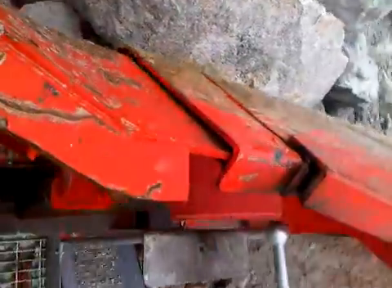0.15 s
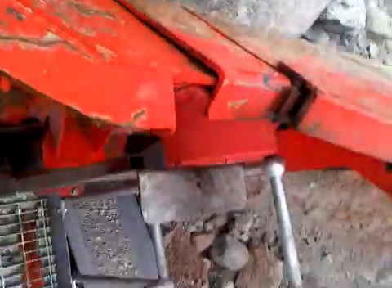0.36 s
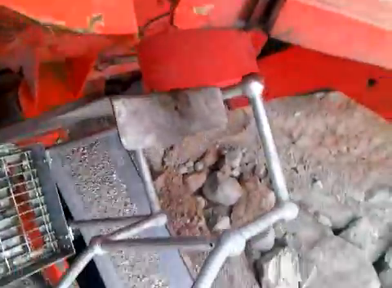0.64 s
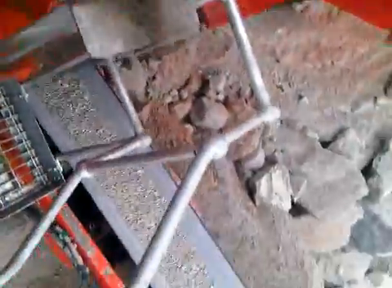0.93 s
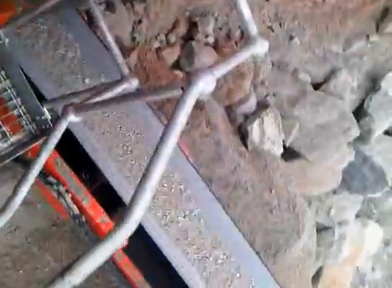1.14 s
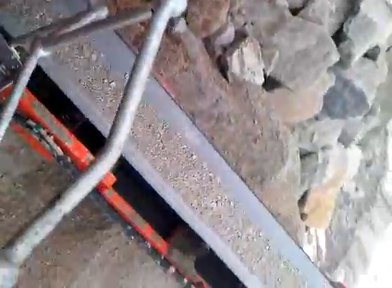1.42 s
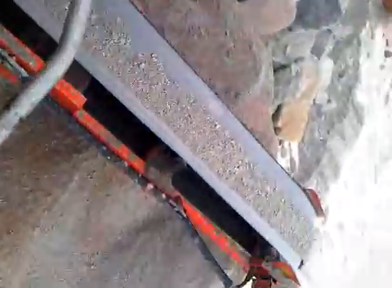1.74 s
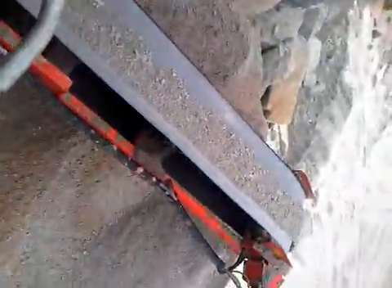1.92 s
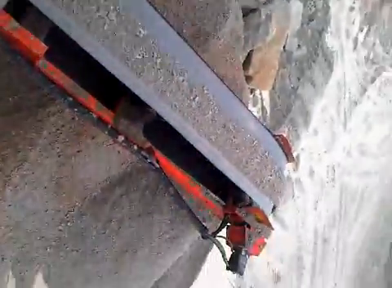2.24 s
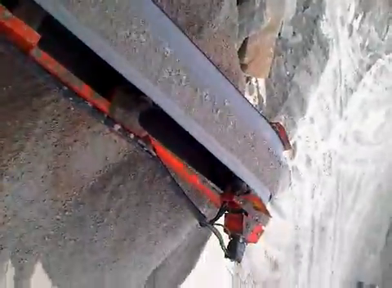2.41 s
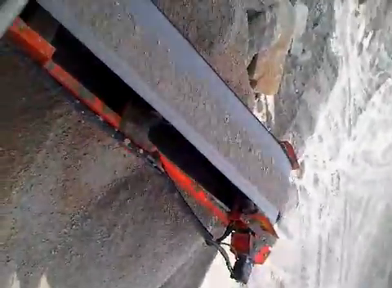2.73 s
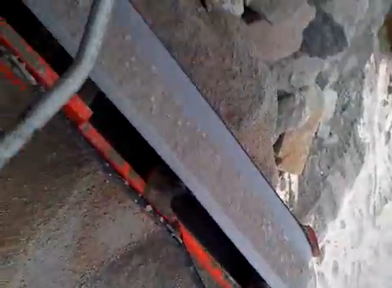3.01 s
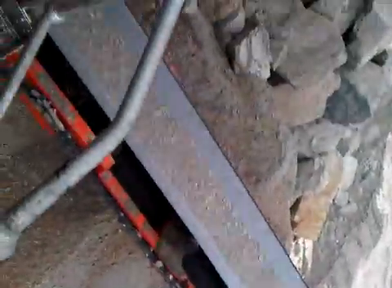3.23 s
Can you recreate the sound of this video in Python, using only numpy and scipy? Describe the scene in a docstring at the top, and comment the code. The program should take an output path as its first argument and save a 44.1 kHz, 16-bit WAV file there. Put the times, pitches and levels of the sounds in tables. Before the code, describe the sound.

From the machine's platform, heavy crunching blows ring a steel chamber in quick rhythm, with stone knocks, a brief clank near 0.85 seconds and constant engine drone; gravel rattle softens as the listener turns away.

```python
"""Jaw crusher in a quarry

Heard from the platform. The jaw bites about 4.6 times a second: random fractures ring the steel chamber.
Big rocks break with a blow and boom, and a low sine pulse is the thump of the overloaded microphone.
Damped modes make stones clack, chips ping and rocks knock. Filtered noise rattles as gravel on the
conveyor; a diesel's harmonics and a shaking frame drone below. Gravel and pebbles weaken as the
listener turns from the jaw.
"""
import sys
import numpy as np
from scipy import signal
from scipy.fft import rfft, irfft, next_fast_len
from scipy.io import wavfile
from scipy.ndimage import uniform_filter1d, map_coordinates

SR = 44100
rng = np.random.default_rng(int(sys.argv[2]) if len(sys.argv) > 2 else 0)


def generate_wav(sig):
    """Save sig (samples, or channels by samples) to the path in sys.argv[1] as 16-bit PCM at SR."""
    pcm = np.round(np.clip(np.atleast_2d(sig).T, -1, 1) * 32767).astype(np.int16)
    wavfile.write(sys.argv[1], SR, pcm)


N = 148617
T = np.arange(N) / SR

# Bites of the jaw. Each row: peak in seconds, rumble in dB, crunch in dB.
BITES = [(0.053, -16, -25), (0.281, -19, -17.5), (.505, -24, -17.5), (0.718, -19.5, -23), (0.938, -16, -22),
         (1.176, -15.5, -24), (1.377, -12.5, -16.5), (1.6, -17.5, -24), (1.816, -15.5, -23),
         (2.044, -14, -20), (2.243, -20.5, -25.5), (2.469, -15.5, -27), (2.691, -39, -29),
         (2.905, -23, -32), (3.128, -18.5, -18.5), (3.339, -16.5, -33)]
BITE_RISE_S, BITE_FALL_S = 0.04, 0.043
# Steel jaw housing. Each row: resonance in Hz, width in Hz, level in dB.
CHAMBER_MODES = [(160, 78, 3.5), (263, 111, 0.5), (371, 74.6, 3), (510, 65.7, 3.5), (752, 89, -5),
                 (1100, 450, -19.5)]
# Spectrum of crumbling stone. Each row: frequency in Hz, level in dB.
CRUNCH_SPECTRUM = [(150, -16.5), (500, 17.5), (900, 4), (1400, 5.5), (1950, -1.5), (2500, -12), (3700, -12),
                   (5000, -23), (6600, -21.5), (8500, -39)]

# Big rocks breaking. Each row: start in seconds, blow in dB, low thump of the overloaded microphone in dB,
# boom of the housing in dB.
BREAKS = [(0.055, -3, -19, -15.5), (.276, 0.5, -25, -20), (.3, -3.5, -21, -31.5), (0.929, -14, -55, -14.5),
          (1.371, 0, -18, -13.5), (1.573, 1, -25, -15), (1.821, -9.5, -51, -24), (2.048, -4, -24, -16),
          (3.127, -15, -54, -9.5)]
SHATTER_DB, SHATTER_T60_S = -11.5, 0.095  # dB relative to the blow
OVERLOAD_THUMP_HZ, OVERLOAD_THUMP_SIGMA_S = 37.7, 0.01
BOOM_HZ, BOOM_WANDER_HZ, BOOM_T60_S = 518.5, 17.8, 0.34

# Rocks lurching against the chamber walls. Each row: start in seconds, level in dB, pitch in Hz.
LUMPS = [(0.026, -18, 196), (.297, -22, 355), (0.378, -15, 171), (0.536, -11.5, 247), (0.671, -12.5, 290),
         (0.866, -9.5, 386), (0.99, -9.5, 168), (1.217, -13, 179), (1.804, -16, 184), (1.837, -13, 426),
         (2.052, -10.5, 155), (2.449, -11.5, 171), (3.094, -9, 475), (3.209, -11, 161)]
# Modes of a lurching rock. Each row: ratio to its pitch, level in dB.
LUMP_MODES = [(0.999, 2), (1.37, -9), (2.3, -11.5)]
LUMP_T60_S, LUMP_ATTACK_S = 0.13, 0.0044  # at ratio 1

# Loose stones striking. Each row: start in seconds, ring in dB, crack in dB, pitch in Hz, T60 in seconds.
STONES = [(.475, -7.5, -27, 886, 0.04), (.537, -16, -35, 1100, 0.098), (1.073, -14.5, -32.5, 1042, 0.078),
          (1.21, -17.5, -29, 1010, 0.073), (1.743, -18.5, -32.5, 890, .04),
          (2.021, -15, -23.5, 1106, 0.046), (2.245, -13, -30.5, 827, 0.041), (2.326, -18, -30, 776, .04),
          (3.145, -22.5, -26, 1644, 0.072)]
# Modes of a stone. Each row: ratio to its pitch, level in dB.
STONE_MODES = [(.62, -11), (.93, -6), (1, 0), (1.1, -6), (1.27, -10), (1.46, -11)]
# Contact of stone on stone. Each row: frequency in Hz, level in dB.
CRACK_SPECTRUM = [(600, 8.5), (2500, 0), (4000, -1.5), (5000, -9), (7000, -7.5), (8500, -23.5)]
CRACK_T60_S = 0.047
# Sharp splinters of stone. Each row: start in seconds, level in dB.
SPLINTERS = [(0.157, -29), (.234, -19.5), (.486, -26), (0.977, -33.5), (2.056, -21)]
# A stone hits a steel bar and rebounds. Each row: start in seconds, level in dB, tilt in dB per octave.
CLANKS = [(0.8399, -20.5, 4), (0.846, -10, -4)]
# Modes of the steel bar. Each row: frequency in Hz, level in dB, T60 in seconds.
BAR_MODES = [(1389, 1, .04), (1744, -2, .045), (2040, -5, .06), (2620, -8, .045), (3900, -13, .02)]
CLANK_CRACK_DB = -24
# Pebbles: pitch and level at the middle of their spread.
PEBBLE_HZ, PEBBLE_SPREAD, PEBBLE_DB, PEBBLE_T60_S = 941, 0.28, -28, 0.035

# A stone scrapes over steel.
SCRAPE_START_S, SCRAPE_HOLD_S, SCRAPE_T60_S, SCRAPE_DB = 0.15, 0.025, 0.18, -40
# The scraped steel. Each row: resonance in Hz, width in Hz, level in dB.
SQUEAL_MODES = [(4200, 90, -15), (5100, 28, 11), (6300, 210, 4)]
# Chips hitting steel. Each row: start in seconds, plate in dB, grate in dB.
PINGS = [(0.189, -27.5, -40), (.23, -32, -34), (.377, -33, -52), (0.577, -33, -39), (1.012, -33, -58),
         (1.1, -53, -36), (1.265, -35.5, -34), (1.611, -33.5, -35), (2.595, -57, -34.5), (3.147, -32, -48)]
PLATE_HZ, PLATE_T60_S, GRATE_HZ, GRATE_T60_S = 2430, 0.18, 3730, 0.15

# Spectrum of the gravel. Each row: frequency in Hz, level in dB.
GRAVEL_SPECTRUM = [(300, -21.5), (750, 6), (1100, 3), (1900, -1.5), (2350, -11), (3100, -13.5),
                   (3800, -14.5), (4400, -18), (5400, -23.5), (6500, -24), (7300, -29), (8500, -63.5)]
# Gain of gravel and pebbles as the listener turns. Each row: time in seconds, gain in dB.
TURN_GAIN = [(0, 10), (.25, 5.5), (.55, 6.5), (.68, 2), (1.0, 3), (1.5, 4), (1.95, 1.5), (2.6, 2),
             (3.37, 2)]
GRAVEL_BASE_DB, GRAVEL_GRAINS_PER_S = -31, 1100
CLUMP_DB, CLUMP_KNOTS_PER_S = 1.5, 30  # unevenness of the gravel flow

# Engine harmonics. Each row: multiple of the firing rate, mean level in dB rms.
ENGINE_ORDERS = [(1, -34.5), (2, -31), (3, -33.5), (4, -32)]
FIRING_HZ = 92.85
# Thin tones of the running gear. Each row: frequency in Hz, mean level in dB rms.
GEAR_TONES = [(6366, -69.5), (6555, -71)]
# Drone of the frame. Each row: frequency in Hz, level in dB.
FRAME_SPECTRUM = [(25, -45), (45, -36.5), (66, -8), (80, -9), (100, -2), (135, -0.5), (240, 0.5), (292, -2),
                  (325, -3), (390, -1), (450, -1.5), (520, -3.5), (700, -11.5), (1000, -19.5),
                  (1400, -56.5), (2200, -110)]
FRAME_BASE_DB = -17.5
NEAR_DB, NEAR_S = 1.5, 0.26  # extra rumble while facing the jaw, and its fading time
WALL_T60_S, WALL_DB = 0.18, -8.5
CLIP_LEVEL, TOP_HZ = 0.72, 8500


def jaw():
    """Each bite swells and fades: coarse fractures shake the housing, fine ones crunch."""
    coarse = grains(900, spread_db=3)
    fine = grains(900, spread_db=4)
    force, crumble = np.zeros(N), np.zeros(N)
    for peak_s, rumble_db, crunch_db in BITES:
        width_s = np.where(T < peak_s, BITE_RISE_S, BITE_FALL_S)
        shape = np.exp(-np.abs((T - peak_s) / width_s) ** 1.33)
        force += amp(rumble_db) * shape
        crumble += amp(crunch_db) * shape
    rumble = housing(coarse * force) / housing(coarse).std()
    crunch = unit(coloured(fine + walls(fine), CRUNCH_SPECTRUM))
    return rumble + crumble * crunch


def breaks():
    """A big rock gives way: hard blow, shattering, boom of the housing, thump of the overloaded microphone."""
    cracks = grains(2300, spread_db=3.5)
    body, burst, boom = np.zeros(N), np.zeros(N), np.zeros(N)
    knock = housing(1.0 * (T == 0))[:SR // 4]  # impulse response
    knock = knock / np.abs(knock).max()
    for start_s, blow_db, overload_thump_db, boom_db in BREAKS:
        add(body, start_s, amp(blow_db) * knock)
        burst += amp(blow_db + SHATTER_DB) * dying(start_s, SHATTER_T60_S)
        boom += amp(boom_db) * dying(start_s, BOOM_T60_S)
        t = T - start_s - OVERLOAD_THUMP_SIGMA_S / 2
        pulse = np.exp(-0.5 * (t / OVERLOAD_THUMP_SIGMA_S) ** 2)
        body += amp(overload_thump_db) * np.sin(2 * np.pi * OVERLOAD_THUMP_HZ * t) * pulse
    shatter = housing(cracks * burst) / housing(cracks).std()
    crunch = coloured(cracks * burst, CRUNCH_SPECTRUM) / coloured(cracks, CRUNCH_SPECTRUM).std()
    boom_tone = tone(BOOM_HZ + BOOM_WANDER_HZ * wobble(100))
    return body + shatter + 0.5 * crunch + uniform_filter1d(boom, SR // 100) * boom_tone


def lumps():
    """Heavy rocks knock dully in the chamber: damped modes, each rock at its own pitch."""
    out = np.zeros(N)
    for start_s, db, pitch_hz in LUMPS:
        for ratio, mode_db in LUMP_MODES:
            hz = pitch_hz * ratio * (1 + rng.normal(0, 0.025))
            mode = ring(hz, LUMP_T60_S / np.sqrt(ratio), LUMP_ATTACK_S / ratio)
            add(out, start_s, amp(db + mode_db) * mode)
    return out


def stones():
    """Stones ring with a sharp crack, splinters only snap, and one stone clanks on a steel bar."""
    out, cracks = np.zeros(N), np.zeros(N)
    for start_s, ring_db, crack_db, hz, t60_s in STONES:
        add(out, start_s, amp(ring_db) * clack(hz, t60_s))
        add(cracks, start_s, amp(crack_db) * crack())
    for start_s, db in SPLINTERS:
        add(cracks, start_s, amp(db) * crack())
    for start_s, db, tilt_db in CLANKS:
        for hz, mode_db, t60_s in BAR_MODES:
            octaves = np.log2(hz / BAR_MODES[0][0])
            gain = amp(db + mode_db + tilt_db * octaves)
            add(out, start_s, gain * ring(hz, t60_s, attack_s=0.00054))
        add(cracks, start_s, amp(CLANK_CRACK_DB) * crack())
    return out + coloured(cracks, CRACK_SPECTRUM)


def pebbles(count):
    """Smaller stones tumble at random as brief rings; higher ones tend to be weaker."""
    out = np.zeros(N)
    for when, pitch, size in rng.uniform(-0.91, 1, (count, 3)):
        ratio = np.exp(2 * PEBBLE_SPREAD * pitch)
        gain = amp(PEBBLE_DB + 5 * size) / ratio
        add(out, (when + 1) / 2 * T[-1], gain * clack(PEBBLE_HZ * ratio, PEBBLE_T60_S))
    return out * turn_gain()


def scrape():
    """A stone scrapes over steel: tiny impacts excite its resonances in a brief squeal."""
    fade_s = np.maximum(T - SCRAPE_START_S - SCRAPE_HOLD_S, 0)
    stroke = (T >= SCRAPE_START_S) * amp(-60 * fade_s / SCRAPE_T60_S)
    squeal = unit(resonant(grains(1500, spread_db=3), SQUEAL_MODES))
    return amp(SCRAPE_DB) * stroke * squeal


def steel():
    """Chips ring a plate and a grate; the grate has a close pair of modes."""
    out = np.zeros(N)
    for start_s, plate_db, grate_db in PINGS:
        plate = ring(PLATE_HZ + rng.normal(0, 8), PLATE_T60_S, attack_s=0.0021)
        add(out, start_s, amp(plate_db) * plate)
        for ratio in (1, 1.03):
            grate = ring(GRATE_HZ * ratio + rng.normal(0, 40), GRATE_T60_S, attack_s=0.002)
            add(out, start_s, amp(grate_db) / 2 * grate)
    return out


def conveyor():
    """Gravel rattles in clumps on the belt and chute: coloured grains and noise."""
    clumps = amp(CLUMP_DB * wobble(CLUMP_KNOTS_PER_S))
    impacts = grains(GRAVEL_GRAINS_PER_S, spread_db=2.0) + 1.02 * rng.standard_normal(N)
    rattle = unit(coloured(impacts * clumps, GRAVEL_SPECTRUM))
    return amp(GRAVEL_BASE_DB) * turn_gain() * rattle


def drive():
    """Diesel firing orders, the shaking frame and thin whines of the running gear."""
    phase = 2 * np.pi * np.cumsum(FIRING_HZ * (1 + 0.008 * wobble(8))) / SR
    tones = np.zeros(N)
    for order, db in ENGINE_ORDERS:
        tones += amp(db + 2.83 * wobble(16)) * np.sin(order * phase + rng.uniform(0, 2 * np.pi))
    for hz, db in GEAR_TONES:
        tones += amp(db + 1.6 * wobble(11)) * tone(hz + 12 * wobble(50))
    near_db = NEAR_DB * np.exp(-(T / NEAR_S) ** 2)
    frame = unit(coloured(grains(3000, spread_db=2.5), FRAME_SPECTRUM))
    return np.sqrt(2) * tones + frame * amp(FRAME_BASE_DB + near_db + 0.9 * wobble(17))


def walls(x):
    """Short diffuse echoes between the steel plates: a decaying noise tail."""
    t = np.arange(SR // 3) / SR
    tail = rng.standard_normal(len(t)) * amp(-60 * t / WALL_T60_S) * (t > 0.003)
    return signal.fftconvolve(x, tail / np.linalg.norm(tail))[:N]


def housing(x):
    """The broad resonances of the crushing chamber."""
    return resonant(x, CHAMBER_MODES)


def clack(hz, t60_s):
    """The brief ring of one stone: modes with slightly random pitch and level."""
    out = 0
    for ratio, db in STONE_MODES:
        gain = amp(db + rng.normal(0, 1))
        mode_hz = hz * ratio * (1 + rng.normal(0, 0.015))
        out = out + gain * ring(mode_hz, t60_s, attack_s=0.001)
    return out


def crack():
    """The short decaying noise of one hard contact."""
    t = np.arange(SR // 20) / SR
    return rng.standard_normal(len(t)) * amp(-60 * t / CRACK_T60_S)


def ring(hz, t60_s, attack_s):
    """One damped mode."""
    t = np.arange(SR // 4) / SR
    return np.sin(2 * np.pi * hz * t) * amp(-60 * t / t60_s) * (1 - np.exp(-t / attack_s))


def grains(rate_per_s, spread_db):
    """Random tiny impacts of uneven size and either sign, rms 1."""
    size = amp(spread_db * np.clip(rng.standard_normal(N), -2, 2)) * rng.choice([-1, 1], N)
    return unit((rng.random(N) < rate_per_s / SR) * size)


def tone(hz):
    """A sine that follows a curve of frequency."""
    return np.sin(2 * np.pi * np.cumsum(hz) / SR)


def dying(start_s, t60_s):
    """Sudden onset and exponential decay."""
    return (T >= start_s) * 1e3 ** (-np.maximum(T - start_s, 0) / t60_s)


def turn_gain():
    """Gain of gravel and pebbles as the listener turns."""
    return amp(np.interp(T, *np.transpose(TURN_GAIN)))


def wobble(knots_per_s):
    """A smooth random curve through normally distributed knots."""
    return map_coordinates(rng.standard_normal(400), [T * knots_per_s + 2], mode="mirror")


def resonant(x, modes):
    """x through parallel band-pass resonances of alternating sign."""
    def response(f):
        total = 0
        for k, (centre, width, db) in enumerate(modes):
            band = 1j * f * width / (centre * centre - f * f + 1j * f * width)
            total = total + (-1) ** k * amp(db) * band
        return total
    return filtered(x, response)


def coloured(x, points):
    """Causal minimum-phase filter through (Hz, dB) points."""
    def response(hz):
        f, db = np.transpose(points)
        curve_db = np.interp(np.log(hz + 1), np.log(f + 1), db)
        cepstrum = irfft(np.log(amp(curve_db)))
        half = len(cepstrum) // 2
        cepstrum[1:half] *= 2  # fold onto positive time
        cepstrum[half + 1:] = 0
        return np.exp(rfft(cepstrum))
    return filtered(x, response)


def filtered(x, response):
    """x times a complex response of frequency."""
    m = 2 * next_fast_len(N)
    return irfft(rfft(x, m) * response(np.fft.rfftfreq(m, 1 / SR)), m)[:N]


def add(out, start_s, x):
    """Mix x into out from start_s."""
    part = out[max(round(start_s * SR), 0):][:len(x)]
    part += x[:len(part)]


def unit(x):
    """Scale to rms 1."""
    return x / np.sqrt(np.mean(x ** 2) + 1e-20)


def amp(db):
    """Decibels to gain."""
    return 10 ** (np.asarray(db) / 20)


def scene():
    """The whole plant from the platform; stones and pebbles also echo off the walls."""
    clacks = stones() + pebbles(count=130)
    crusher = jaw() + breaks() + lumps()
    loose = clacks + amp(WALL_DB) * walls(clacks) + scrape() + steel()
    return (crusher + loose + conveyor() + drive())[None]


def record(dry):
    """The loudest peaks are flattened, then a steep low-pass limits the band."""
    x = dry[0] / (1 + np.abs(dry[0] / CLIP_LEVEL) ** 8) ** (1 / 8)
    return filtered(x, lambda hz: 1 / np.sqrt(1 + (hz / TOP_HZ) ** 90))[None]


dry = scene()
out = record(dry)
generate_wav(out)
```